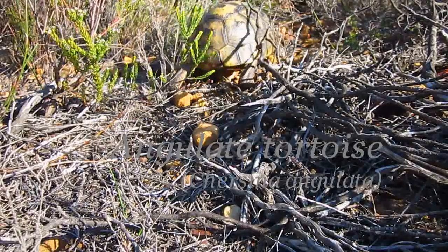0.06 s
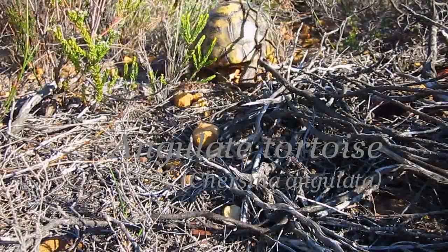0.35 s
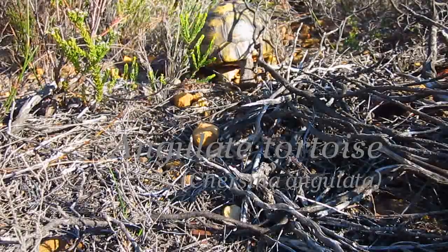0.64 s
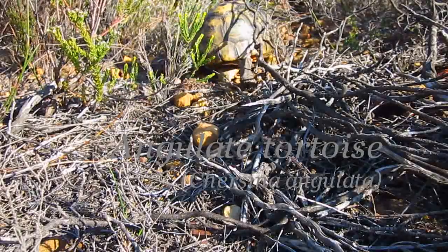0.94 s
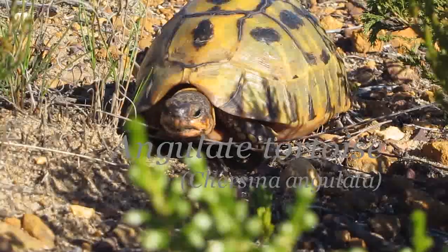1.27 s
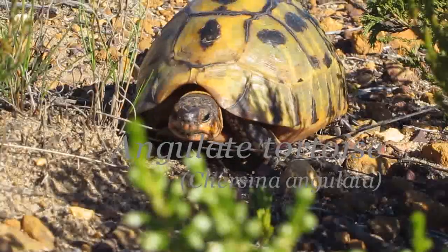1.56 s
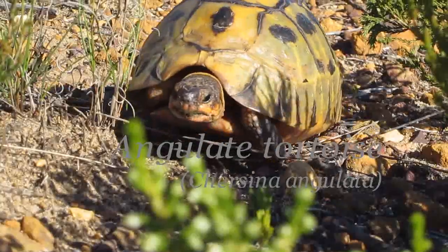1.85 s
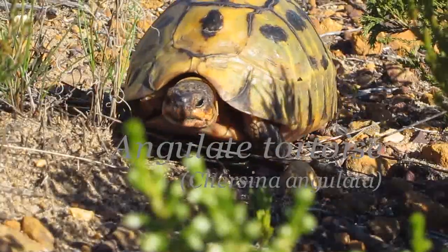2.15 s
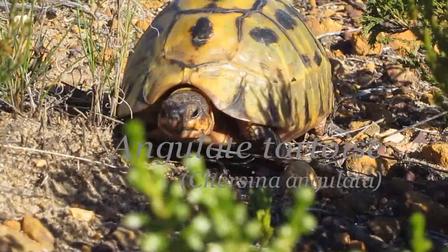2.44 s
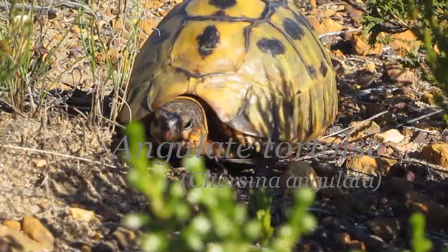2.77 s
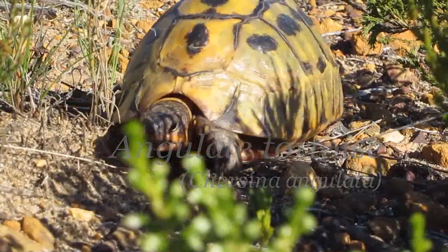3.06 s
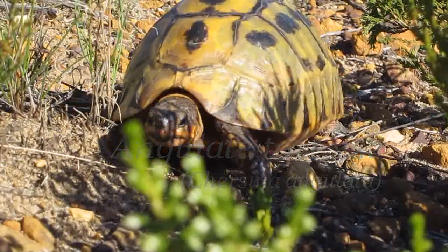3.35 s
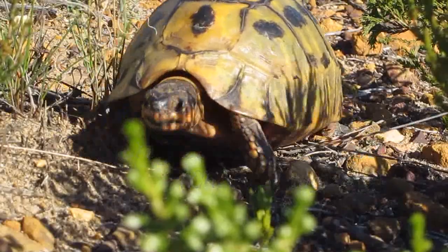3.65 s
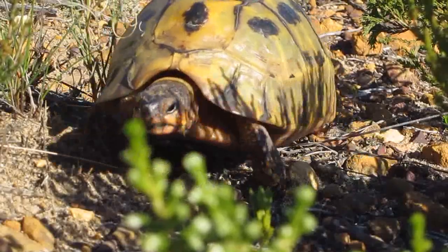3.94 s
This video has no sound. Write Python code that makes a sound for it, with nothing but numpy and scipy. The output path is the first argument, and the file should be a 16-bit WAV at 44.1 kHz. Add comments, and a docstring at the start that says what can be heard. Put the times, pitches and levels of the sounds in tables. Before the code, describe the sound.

Faint twig snaps and gritty crunches from a walking tortoise, after a little wind.

```python
"""Tortoise on dry twigs and gravel.

Twigs snap, grit crunches under the claws and the dragging shell, a hollow knock rings once.
Light wind bumps the microphone in a wide shot; then a cut to a closer, windless shot.
The camera adds hiss, a thin two-tone whine and a faint motor hum."""
import sys
import numpy as np
from scipy import signal
from scipy.fft import rfft, irfft, next_fast_len
from scipy.io import wavfile
from scipy.ndimage import map_coordinates

SR = 44100
rng = np.random.default_rng(int(sys.argv[2]) if len(sys.argv) > 2 else 0)


def transcribe(signal):
    """Save signal, clipped to [-1, 1], as a 16-bit WAV file at the path in sys.argv[1]."""
    frames = np.atleast_2d(signal).T
    limited = np.clip(frames, -1, 1)
    pcm = np.round(limited * 32767).astype(np.int16)
    wavfile.write(sys.argv[1], SR, pcm)


N = 176400
CLOSE_SHOT_S = 1.31  # cut from the wide shot to the close one


def amp(db):
    """Decibels to gain."""
    return 10 ** (np.asarray(db) / 20)


def unit(x):
    """Scale to rms 1."""
    return x / np.sqrt(np.mean(x ** 2) + 1e-20)


def clock():
    """Sample times in seconds."""
    return np.arange(N) / SR


def curve(rows):
    """Linear interpolation of (time [s], value) rows."""
    return np.interp(clock(), *np.transpose(rows))


def wobble(rate_hz):
    """Smooth random curve, rate_hz knots a second."""
    return map_coordinates(rng.standard_normal(1024), [clock() * rate_hz + 2], mode='wrap')


def fade(t, t60_s):
    """Exponential decay, 60 dB in t60_s."""
    return np.exp(-np.log(1000) * t / t60_s)


def colour(x, spectrum):
    """Minimum-phase filter from (frequency [Hz], gain [dB]) rows; keeps white-noise power."""
    size = 2 * next_fast_len(N // 2 + 8192)
    hz, db = np.transpose(spectrum)
    log_bins = np.log(np.fft.rfftfreq(size, 1 / SR) + 1)
    gain = unit(amp(np.interp(log_bins, np.log(hz), db)))
    cepstrum = irfft(np.log(gain + 1e-6))
    cepstrum[1:size // 2] *= 2
    cepstrum[size // 2 + 1:] = 0
    return irfft(rfft(x, size) * np.exp(rfft(cepstrum)))[:N]


def noise(spectrum):
    """Coloured noise, rms 1."""
    return unit(colour(rng.standard_normal(N), spectrum))


def add(track, start_s, sound):
    """Mix a sound into a track."""
    part = track[max(round(start_s * SR), 0):][:len(sound)]
    part += sound[:len(part)]


def grains(per_s, spread_db=7):
    """Random tiny impacts of uneven size, rms 1."""
    hits = rng.random(N) < per_s / SR
    signs = rng.choice([-1, 1], N)
    return unit(hits * signs * amp(spread_db * rng.standard_normal(N)))


def tone(hz, rms_db, drift_rad, waver_db):
    """Sine drifting slightly in level and phase."""
    peak = np.sqrt(2) * amp(rms_db + waver_db * wobble(5.1))
    return peak * np.sin(2 * np.pi * hz * clock() + drift_rad * wobble(6.56))


# (time [s], level [dB], mode 1 [Hz], mode 2 [Hz], mode 2 [dB re level], t60 [s],
#  crack [dB re level], splinter [dB re level])
TWIG_SNAPS = [(1.0681, -31, 3750, 4240, 2.5, 0.0047, -28, 1.5),
              (1.6043, -39.5, 3000, 4600, -7, 0.012, 6, -2.5),
              (1.6722, -25.5, 4100, 5700, -6, 0.0064, -10.5, -5),
              (1.727, -30, 1640, 2620, 1.5, 0.0075, -4, 0), (2.8375, -33, 2650, 3650, -3, 0.0064, -24, -7),
              (2.9892, -31.5, 3650, 2610, -2.5, 0.0055, -21, -7),
              (3.1005, -32, 2970, 4400, 5, 0.0027, -17, -4),
              (3.1813, -26.5, 2820, 3600, -13, 0.0044, -22, -8.5),
              (3.556, -34, 2890, 2440, -9, 0.0065, -13, -7)]
# (frequency [Hz], gain [dB])
SPLINTER_SPECTRUM = [(300, -26), (2000, -10), (3200, 0), (4300, 3), (5100, 1), (6000, 5.5), (7000, -2),
                     (7900, -0.5), (9300, -14), (11500, -49), (15000, -18)]
CRACK_SPECTRUM = [(100, -22), (500, 4.5), (1000, 10), (1800, -0.5), (4500, -3), (8000, -12), (11000, -35)]


def twigs(ring_rise_s=0.00013, splinter_t60_s=0.0021):
    """Each snap: a brief two-mode ring, bright splintering and a duller crack."""
    ring, splinter, crack = np.zeros((3, N))
    t = np.arange(SR // 20) / SR
    for start_s, db, mode1_hz, mode2_hz, mode2_db, t60_s, crack_db, splinter_db in TWIG_SNAPS:
        splinter_noise, crack_noise = rng.choice([-1, 1], (2, len(t)))
        modes = np.sin(2 * np.pi * mode1_hz * t) + amp(mode2_db) * np.sin(2 * np.pi * mode2_hz * t)
        rise = 1 - np.exp(-t / ring_rise_s)
        add(ring, start_s, amp(db) * rise * fade(t, t60_s) * modes)
        add(splinter, start_s, amp(db + splinter_db) * fade(t, splinter_t60_s) * splinter_noise)
        add(crack, start_s, amp(db + crack_db) * fade(t, t60_s) * crack_noise)
    return ring + colour(splinter, SPLINTER_SPECTRUM) + colour(crack, CRACK_SPECTRUM)


# (centre time [s], length [s], level [dB])
CLAW_CRUNCHES = [(0.758, 0.01, -55), (1.851, 0.0055, -57), (2.069, 0.0093, -53), (2.105, .005, -55),
                 (2.127, 0.0038, -55), (2.468, .016, -53.5), (2.487, 0.025, -53.5), (2.569, 0.0058, -50),
                 (2.626, 0.0053, -53.5), (2.668, 0.0024, -51), (2.71, 0.0074, -54), (2.749, 0.023, -61),
                 (2.798, 0.018, -53), (2.838, 0.007, -50), (2.855, 0.0052, -49), (2.874, 0.01, -57),
                 (2.956, .012, -67), (2.963, 0.0077, -43.5), (2.986, 0.0067, -45.5), (3.008, 0.013, -52),
                 (3.046, 0.0046, -49), (3.096, 0.01, -45), (3.11, 0.034, -52.5), (3.139, 0.012, -50.5),
                 (3.272, 0.0098, -58.5), (3.564, 0.002, -49), (3.686, 0.018, -56), (3.88, 0.0089, -48)]
# (time [s], level [dB])
SHELL_DRAG = [(1.3, -82), (1.8, -80), (2.3, -70.5), (2.8, -65), (3.3, -73.5), (3.7, -66.5), (4, -67.5)]
# (frequency [Hz], gain [dB])
GRIT_SPECTRUM = [(300, -14), (1200, -8.5), (2600, 3), (4300, -3), (7000, -8.5), (9000, -14.5), (11500, -50),
                 (15000, -24)]


def gravel(swarm_gain_db=-2, large_grain_gain_db=17.5):
    """Claws crunch a swarm of grains as one large grain gives way; the shell drags over sparse ones."""
    t, claws = clock(), np.zeros(N)
    swarm = grains(per_s=1900)
    for centre_s, length_s, db in CLAW_CRUNCHES:
        envelope = np.exp(-(2 * (t - centre_s) / length_s) ** 2)
        envelope_rms = np.sqrt(np.mean(envelope ** 2))
        claws += amp(db + swarm_gain_db) * unit(envelope * swarm) * envelope_rms
        add(claws, centre_s, amp([db + large_grain_gain_db]))
    shell = amp(curve(SHELL_DRAG)) * grains(per_s=170)
    return colour(claws + shell, GRIT_SPECTRUM)


# (frequency [Hz], level [dB], t60 [s])
KNOCK_MODES = [(439, -30.5, 0.13), (349, -36.5, 0.1), (200, -28, 0.028)]


def knock(start_s=1.6055, rise_s=0.0036):
    """A bumped hollow body rings in three low modes."""
    t = np.maximum(clock() - start_s, 0)
    modes = sum(amp(db) * fade(t, t60_s) * np.sin(2 * np.pi * hz * t) for hz, db, t60_s in KNOCK_MODES)
    return (1 - np.exp(-t / rise_s)) * modes


def ground_echo(direct, gain_db=-9.5, t60_s=0.046):
    """Direct sound plus short, weak scatter off ground and scrub."""
    t = np.arange(SR // 10) / SR
    tail = rng.standard_normal(len(t)) * fade(t, t60_s)
    return direct + amp(gain_db) * signal.fftconvolve(direct, tail / np.linalg.norm(tail))[:N]


# (time [s], level [dB], frequency [Hz])
EDDY_BUMPS = [(.004, -21.5, 375), (0.026, -21.5, 198), (0.091, -21.5, 210), (.101, -29, 229),
              (0.1177, -21.5, 280), (0.1346, -12, 191), (.140, -25.5, 245), (.154, -19.5, 154),
              (0.239, -31.5, 196), (.267, -28, 246), (.369, -26.5, 160), (.383, -23, 240), (.394, -27, 150),
              (.409, -19, 123), (0.431, -29.5, 162), (0.5, -16.5, 195), (0.521, -25, 100),
              (.531, -29.5, 178), (0.632, -32, 99), (0.781, -36, 86), (1.08, -30, 109), (1.1143, -22, 155)]
# (time [s], level [dB])
RUMBLE_LEVEL = [(0, -30.5), (.065, -47.5), (.13, -33.5), (.21, -45), (.34, -45), (.4, -37), (.47, -44.5),
                (.52, -42.5), (.58, -52), (.9, -52.5), (1.0, -50.5), (1.12, -46.5), (1.16, -50), (1.3, -59)]
# (frequency [Hz], gain [dB])
RUMBLE_SPECTRUM = [(20, -7.5), (45, -3.5), (105, 1.5), (220, -5), (400, -13.5), (800, -33), (1600, -64),
                   (4000, -80)]
RASP_SPECTRUM = [(80, -13.5), (250, -7.5), (450, -2), (750, -8.5), (1200, -23), (2000, -34.5),
                 (5000, -54.5)]


def wind(half_width_cycles=0.43, rasp_gain_db=-27, rasp_half_width_s=0.0064):
    """Each eddy at the microphone: one pressure swing with a turbulent rasp, over uneven rumble."""
    t, turbulence = clock(), noise(RASP_SPECTRUM)
    pressure = amp(curve(RUMBLE_LEVEL)) * noise(RUMBLE_SPECTRUM) * (t < CLOSE_SHOT_S)
    for centre_s, db, hz in EDDY_BUMPS:
        cycles = (t - centre_s) * hz
        envelope = 1 / np.cosh(np.clip(cycles / half_width_cycles, -20, 20)) ** 2
        swing = -np.sin(2 * np.pi * cycles) * envelope
        rasp = amp(rasp_gain_db) * turbulence * np.exp(-((t - centre_s) / rasp_half_width_s) ** 2)
        pressure += amp(db) * (swing + rasp)
    return pressure


# (frequency [Hz], gain [dB])
CLOSE_AIR_SPECTRUM = [(20, -1.5), (45, 3), (70, -1.5), (130, 1), (380, -3.5), (700, -7), (1200, -11),
                      (2000, -14.5), (4300, -17.5), (7000, -23), (8500, -32), (10000, -39), (12000, -61),
                      (15000, -40.5)]
WIDE_AIR_SPECTRUM = [(20, -13), (60, 2), (120, -2.5), (400, 0), (800, -4), (1500, -10), (2500, -14),
                     (4500, -16.5), (7000, -21.5), (8500, -30.5), (10000, -37.5), (12000, -55),
                     (15000, -39.5)]


def air_hiss(close_db=-53, wide_db=-49.5):
    """Outdoor air and camera hiss, quieter in the close shot."""
    close = amp(close_db) * noise(CLOSE_AIR_SPECTRUM)
    wide = amp(wide_db) * noise(WIDE_AIR_SPECTRUM)
    return np.where(clock() > CLOSE_SHOT_S, close, wide)


# (frequency [Hz], base level [dB])
WHINE_TONES = [(5142.5, -62.5), (6857, -67)]
# (time [s], gain [dB])
WHINE_GAIN = [(0, -5.5), (.6, 0), (1.29, -1), (1.33, -9), (1.54, -6), (1.6, -3.5), (4, -1.5)]


def camera_whine():
    """Two thin, high tones that swell and dip together."""
    gain_db = curve(WHINE_GAIN)
    return sum(tone(hz, db + gain_db, drift_rad=0.12, waver_db=1.5) for hz, db in WHINE_TONES)


# (time [s], rms level [dB])
HUM_LOW_LEVEL = [(1.32, -59.5), (2.07, -59.5), (2.65, -59.5), (2.8, -63), (3.3, -58.5), (3.44, -60),
                 (3.5, -78), (3.85, -68), (4, -54.5)]
HUM_HIGH_LEVEL = [(1.32, -63.5), (2.07, -61.5), (2.5, -61), (2.76, -75), (4, -87)]


def motor_hum(low_hz=92.2, high_hz=282):
    """Camera motor: fundamental and a tone near its third harmonic, heard only in the close shot."""
    low = tone(low_hz, curve(HUM_LOW_LEVEL), drift_rad=0.35, waver_db=0.5)
    high = tone(high_hz, curve(HUM_HIGH_LEVEL), drift_rad=0.35, waver_db=0.5)
    return (clock() > CLOSE_SHOT_S) * (low + high)


# (time [s], gain [dB])
HISS_AND_WHINE_GAIN = [(0, -3), (.3, -4), (.65, -2.5), (1.29, -1), (1.325, -4), (1.5, -1), (1.63, 0),
                       (1.9, 0), (2.6, 0.5), (4, 1.5)]


def background():
    """Hiss and whine on one gain curve, plus the hum."""
    return amp(curve(HISS_AND_WHINE_GAIN)) * (air_hiss() + camera_whine()) + motor_hum()


def scene():
    """Tortoise, wind and background at one microphone."""
    return (ground_echo(twigs() + gravel()) + knock() + wind() + background())[None]


def record(dry):
    """Camera band limit and converter DC offset."""
    cutoff_hz, dc_offset = 15850, -0.0065
    size = next_fast_len(N + 8192)
    passband = np.fft.rfftfreq(size, 1 / SR) < cutoff_hz
    return dc_offset + irfft(rfft(dry, size) * passband, size)[:, :N]


dry = scene()
out = record(dry)
transcribe(out)
```